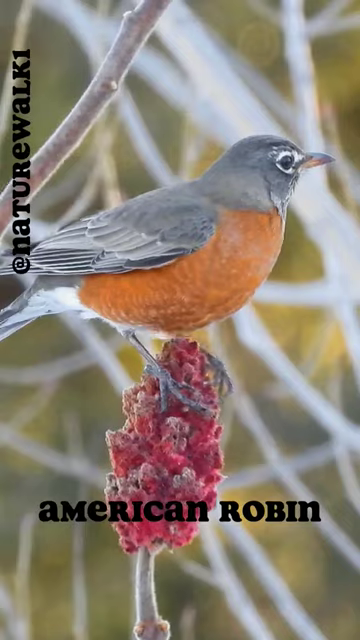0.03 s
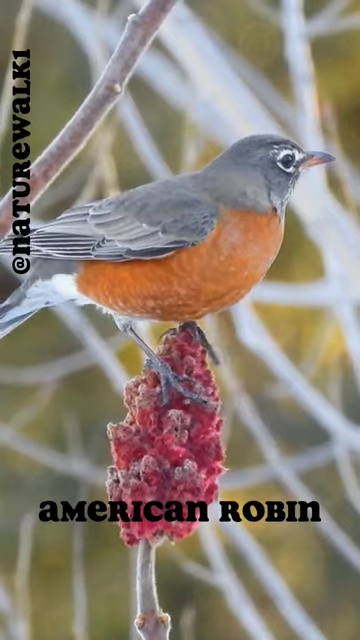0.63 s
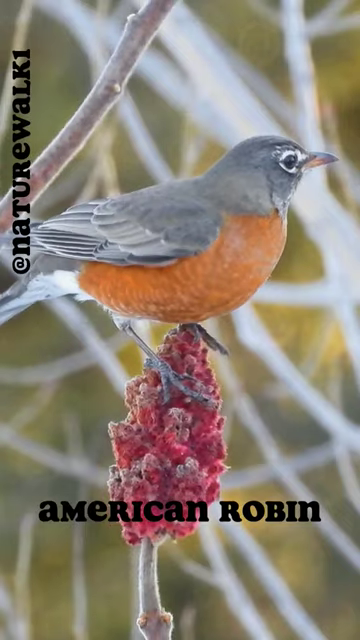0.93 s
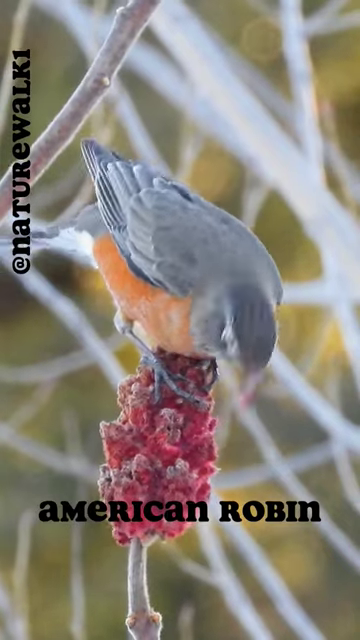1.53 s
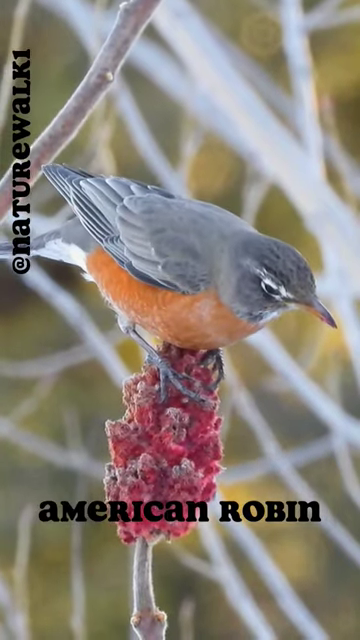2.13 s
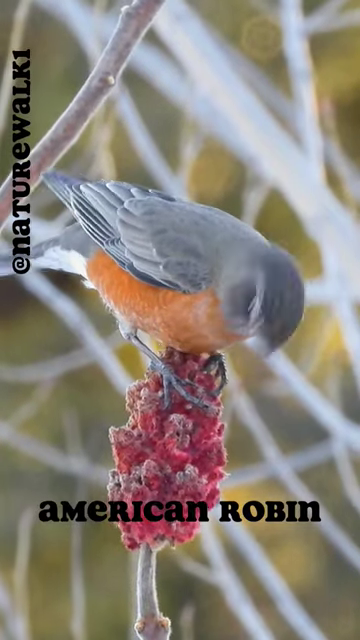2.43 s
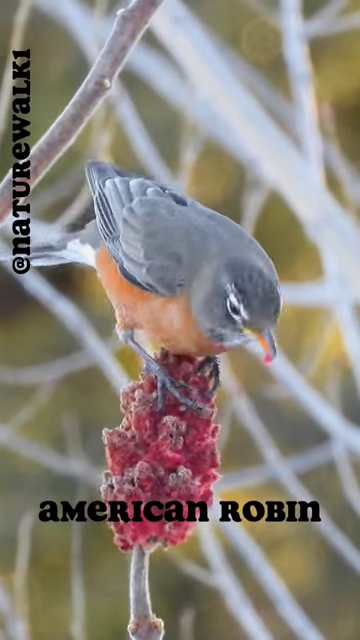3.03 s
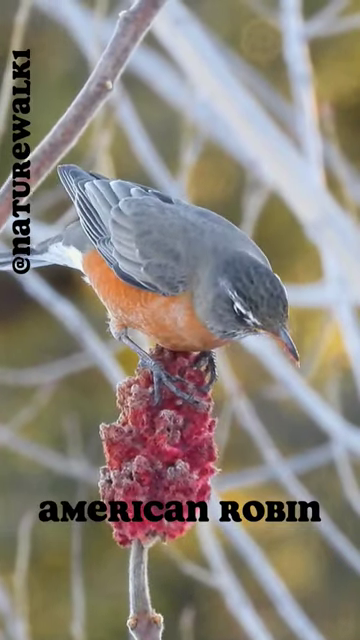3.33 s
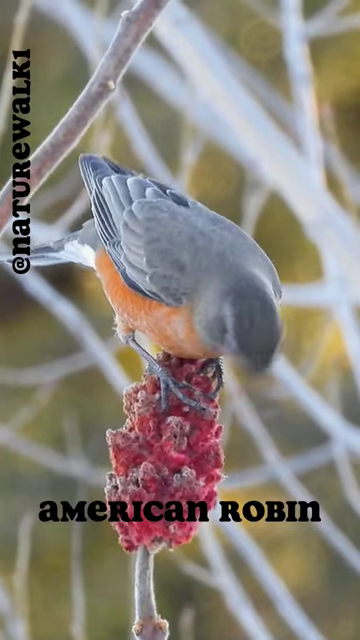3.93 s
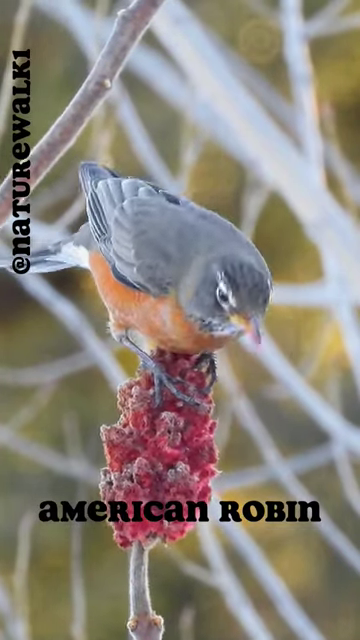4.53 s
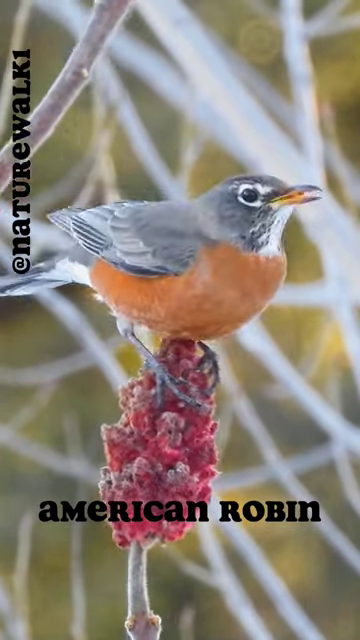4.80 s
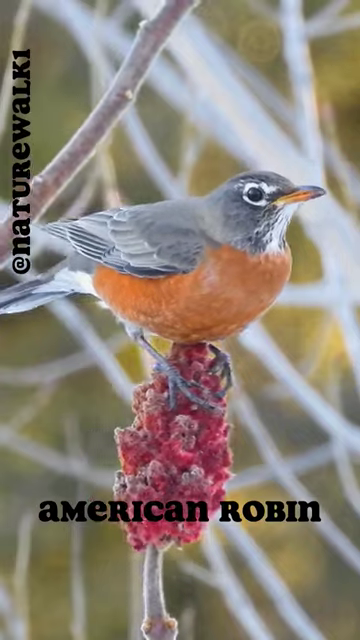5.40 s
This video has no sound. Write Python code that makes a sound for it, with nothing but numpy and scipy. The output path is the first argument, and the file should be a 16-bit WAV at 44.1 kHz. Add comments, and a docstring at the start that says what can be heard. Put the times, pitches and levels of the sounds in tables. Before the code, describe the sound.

A small stream fades in, gurgling with bubbles and a fine hiss of spray, its closest splashes slightly to the right. A songbird whistles three pairs of clear rising notes, then two falling ones opened by quick chips. Near the end, other birds add two sharp downward slides and a thin high call. The whistles echo lightly among the trees.

```python
"""A songbird whistles three pairs of rising slurs, then two falling ones, in bare trees by a small stream.
Two sharp down-slides and a thin high call join in. Each syrinx gives an almost pure, gliding sine;
ground, trunks and twigs echo it. The water gurgles with ringing bubbles and spits fine spray.
The scene fades in from silence."""
import sys
import numpy as np
from scipy import signal
from scipy.fft import rfft, irfft, next_fast_len
from scipy.io import wavfile

SR = 44100
rng = np.random.default_rng(int(sys.argv[2]) if len(sys.argv) > 2 else 0)


def wav_record(signal):
    """Record a signal, one row per channel, as 16-bit PCM in the file named by sys.argv[1]."""
    frames = np.transpose(np.atleast_2d(signal))
    bounded = np.clip(frames, -1, 1)
    # unit amplitude maps onto the largest positive 16-bit level
    quanta = np.round(bounded * 32767).astype(np.int16)
    wavfile.write(sys.argv[1], SR, quanta)


N = 245195
TIME_S = np.arange(N) / SR
FFT_SIZE = next_fast_len(N + SR // 2)
BINS_HZ = np.maximum(np.fft.rfftfreq(FFT_SIZE, 1 / SR), 1)


def from_db(db):
    """Decibels to gain."""
    return 10 ** (np.asarray(db) / 20)


def unit_rms(x):
    """Scale to rms 1."""
    return x / np.sqrt(np.mean(x ** 2) + 1e-20)


def curve_db(points):
    """Interpolate (Hz, dB) points onto BINS_HZ, on a log-frequency axis."""
    hz, db = np.transpose(points)
    return np.interp(np.log(BINS_HZ), np.log(hz), db)


def filtered(x, response):
    """Apply a frequency response given on BINS_HZ."""
    return irfft(rfft(x, FFT_SIZE) * response, FFT_SIZE)[..., :N]


def drift(rate_hz):
    """Smooth random wander, mostly below rate_hz; rms 1."""
    return unit_rms(filtered(rng.standard_normal(N), 1 / (1 + (BINS_HZ / rate_hz) ** 2)))


def ages(length_s):
    """Seconds since onset, per sample."""
    return np.arange(int(length_s * SR)) / SR


def add(out, start_s, sound):
    """Mix a sound in at start_s."""
    i = int(np.clip(start_s * SR, 0, N - 1))
    out[i:i + len(sound)] += sound[:N - i]


# Each row: frequency in Hz, relative spectral density in dB.
WATER_SPECTRUM = [(18, -54), (30, -19.5), (85, -27.5), (202, -10), (270, -12), (379, -4.4), (532, -2.5),
                  (673, -3.5), (852, -4.5), (1080, -4.5), (1400, -4.6), (2490, -7), (4090, -12.5),
                  (7650, -20.5), (13300, -22), (15500, -30)]

def water_colour():
    """Spectrum of running water, unit rms gain over 400-2000 Hz."""
    colour = from_db(curve_db(WATER_SPECTRUM))
    return colour / np.sqrt(np.mean(colour[(BINS_HZ > 400) & (BINS_HZ < 2000)] ** 2))


# Each row: frequency in Hz, gain on the water spectrum in dB.
WASH_EQ = [(60, -3), (180, -1.5), (400, -5.5), (2000, -9.5), (6000, -5.5), (10000, -3), (14000, -6)]
# Each row: frequency in Hz, left minus right in dB.
WASH_PAN = [(70, -6), (170, 12.5), (350, 3)]

def far_wash():
    """The distant stream, blurred to independent noise in each ear."""
    colour = water_colour() * from_db(curve_db(WASH_EQ) + curve_db(WASH_PAN) * [[.5], [-.5]])
    return from_db(-32.5) * filtered(rng.standard_normal((2, N)), colour)


def bubble(hz, t60_s, rise_octaves):
    """A bubble swells within a cycle, then rings down, its pitch climbing as it nears the surface."""
    progress = np.arange(int(t60_s * SR) + 2) / (t60_s * SR)
    cycles = np.cumsum(hz * 2 ** (rise_octaves * progress)) / SR
    return from_db(-60 * progress) * (1 - np.exp(-1.5 * cycles ** 2)) * np.sin(2 * np.pi * cycles)


def babble(low_hz, high_hz, median_cycles, max_octaves, spread_db, count):
    """Many rising bubbles of random size, equal energy per Hz; rms 1."""
    out = np.zeros(N)
    for when, pitch, strength, life, climb in rng.random((count, 5)):
        hz = low_hz * (high_hz / low_hz) ** pitch
        gain = hz * from_db(spread_db * min(-np.log(1 - strength), 3.5))
        t60_s = median_cycles * 2 ** (life * 2 - 1) / hz
        add(out, when * N / SR, gain * bubble(hz, t60_s, max_octaves * climb))
    return unit_rms(out)


def droplets(median_per_s, spread_db):
    """Droplets land as tiny clicks, most of them faint, in loose bunches; rms 1."""
    landed = rng.random(N) < median_per_s * from_db(4 * drift(18)) / SR
    sizes = from_db(spread_db * np.minimum(rng.exponential(1, N), 4))
    return unit_rms(landed * sizes * rng.choice([-1, 1], N))


# Each row: frequency in Hz, gain on the spray in dB.
SPRAY_EQ = [(100, -26), (5000, 0), (8000, 4.5), (11000, 4), (15000, 1)]

def riffle():
    """One stretch of stream: bubbles over a wash; above them the spray fizzes and spits."""
    colour, treble_share = water_colour(), 1 / (1 + (3500 / BINS_HZ) ** 4)
    large = babble(338.4, 890.4, median_cycles=54.4, max_octaves=.68, spread_db=3.8, count=360)
    small = babble(694, 3875, median_cycles=28, max_octaves=.54, spread_db=3, count=1900)
    wash = from_db(6.9) * rng.standard_normal(N) * from_db(3.2 * drift(26))
    gurgle = filtered(from_db(-7) * large + from_db(-.5) * small, colour)
    gurgle += filtered(wash, colour * np.sqrt(1 - treble_share))
    fizz = babble(3320, 11230, median_cycles=60, max_octaves=.059, spread_db=5, count=2600)
    hiss = from_db(1) * rng.standard_normal(N)
    spits = hiss + from_db(-5.5) * fizz + droplets(median_per_s=400, spread_db=2.5)
    flicker = from_db(2.6 * drift(17.5) + 2.2 * drift(220))
    spray = filtered(spits * flicker, colour * np.sqrt(treble_share) * from_db(curve_db(SPRAY_EQ)))
    return from_db(-41.2) * gurgle + from_db(-35.1) * spray


# Each row: start in seconds, pitch in Hz, level in dB, ring time in cycles.
NEAR_BUBBLES = [(0.822, 730, -27.5, 51), (0.948, 850, -26.5, 39), (1.225, 2570, -26, 40),
                (1.289, 706, -22.5, 21), (1.3, 523, -25, 12), (1.402, 970, -27, 53), (1.437, 406, -28, 34),
                (1.47, 1260, -27.5, 35), (1.505, 1680, -25.5, 52), (1.667, 1370, -25.5, 35),
                (1.689, 950, -27, 60), (1.719, 467, -12.5, 21), (1.8736, 3210, -20, 40),
                (1.947, 1570, -28, 30), (2.309, 1354, -23.5, 48), (2.57, 946, -27, 27),
                (2.705, 419, -29, 54), (3.335, 422, -27.5, 63), (3.337, 970, -23.5, 39),
                (3.814, 555, -30.5, 81), (4.09, 1900, -18, 14), (4.1425, 2100, -9, 12),
                (4.211, 528, -17.7, 14), (4.346, 530, -27.5, 46), (4.383, 1960, -26, 60),
                (4.516, 3020, -22, 38), (4.62, 2420, -25, 54), (4.671, 790, -27, 40),
                (4.681, 560, -25.5, 40), (5.053, 312, -33, 72), (5.141, 446, -24.5, 26),
                (5.144, 1480, -17.8, 19), (5.523, 560, -22, 24), (5.526, 920, -17.5, 38)]
# Each row: start in seconds, relative level in dB, pitch of the tiny bubble in Hz.
NEAR_SPLASHES = [(0.688, -29, 9410), (0.7024, -23, 4500), (0.7443, -28, 9540), (0.78, -35, 8120),
                 (0.9974, -34, 3140), (1.178, -30.5, 4600), (1.2155, -26.5, 9670), (1.3003, -24.5, 3540),
                 (1.368, -31, 9500), (1.565, -31, 8000), (1.5805, -29, 7800), (1.602, -31, 8000),
                 (1.618, -32, 5600), (1.668, -36, 8530), (1.7207, -26.5, 8460), (1.7463, -36, 5860),
                 (1.7926, -33.0, 4800), (1.816, -25, 9990), (1.826, -22, 3140), (1.8601, -25.5, 4240),
                 (1.8745, -32, 3290), (2.3602, -29, 7990), (2.3717, -30.1, 4670), (2.62, -33.5, 8700),
                 (2.6764, -31, 4780), (2.8864, -33, 8590), (2.9646, -22, 9750), (3.026, -30.5, 9630),
                 (3.036, -31, 6890), (3.089, -21.5, 9320), (3.118, -34, 9630), (3.2028, -21, 3600),
                 (3.295, -32, 4400), (3.386, -29, 3950), (3.414, -31, 4300), (3.637, -30, 4400),
                 (3.8463, -33.5, 9390), (3.9197, -28.5, 2820), (4.0906, -28.5, 2300), (4.143, -23, 2750),
                 (4.1581, -24, 2740), (4.2883, -29.5, 5560), (4.317, -28.5, 7700), (4.709, -23.5, 8810),
                 (4.8508, -28, 4630), (5.2905, -31, 3920), (5.497, -27, 5000)]

def near_water():
    """Single bubbles, and splashes that crack, leave a tiny bubble and scatter droplets."""
    out, age = np.zeros(N), ages(.05)
    for start_s, hz, db, cycles in NEAR_BUBBLES:
        add(out, start_s, from_db(db) * bubble(hz, cycles / hz, rise_octaves=.14))
    attack_s, crack_s, scatter_s = .0005, .0013, .013
    decay = np.exp(-age / crack_s) + from_db(-13.5) * np.exp(-age / scatter_s)
    burst = decay * (1 - np.exp(-age / attack_s))
    splash_band = signal.butter(1, [2000, 11000], "band", fs=SR, output="sos")
    for start_s, db, hz in NEAR_SPLASHES:
        splash = signal.sosfilt(splash_band, rng.standard_normal(len(age)) * burst)
        add(out, start_s, from_db(db + 4.5) * splash)
        add(out, start_s + .0007, from_db(db + 7.5) * bubble(hz, 14 / hz, rise_octaves=.15))
    # Bubbles radiate almost nothing below their own pitch.
    return signal.sosfilt(signal.butter(4, 250, "high", fs=SR, output="sos"), out)


def from_side(water, left_lag_s):
    """Sound from one side reaches the two ears at different times."""
    return filtered(water, np.exp(1j * np.pi * np.array([[-1], [1]]) * BINS_HZ * left_lag_s))


def stream():
    """Water on both sides; the nearest bubbles and splashes are on the right."""
    right = from_side(riffle() + near_water(), left_lag_s=3.9e-5)
    left = from_side(from_db(-5) * riffle(), left_lag_s=-2.3e-5)
    return right + left + far_wash()


# Ground and trunk echoes. Each row: delay in seconds, relative left and right levels in dB.
EARLY_ECHOES = [(.0074, -11.5, -7), (0.0139, -6, -21), (0.015, -4.5, -9.5), (0.0237, -37, -22),
                (0.0257, -17, -14), (0.028, -13, -11), (0.0527, -19, -11)]
# Twigs scatter short waves best. Each row: frequency in Hz, gain in dB.
TWIG_EQ = [(2350, -4.5), (2750, -1.5), (3250, 1.5), (3800, -.5)]

def woods(song, pan_db, early_db, twigs_db, trunks_db):
    """Early echoes beat against the glides; twigs add a short tail, far trunks a long one."""
    out = song * from_db([[pan_db / 2], [-pan_db / 2]])
    for delay_s, left_db, right_db in EARLY_ECHOES:
        echo = np.interp(TIME_S - delay_s, TIME_S, song, left=0)
        out += from_db(early_db) * echo * from_db([[left_db], [right_db]])
    age, scattered = ages(2), filtered(song, from_db(curve_db(TWIG_EQ)))
    for tail_db, t60_s, build_s in ((twigs_db, .13, .025), (trunks_db, .95, .03)):
        mid, side = rng.standard_normal((2, len(age)))
        envelope = from_db(-60 * age / t60_s) * (1 - np.exp(-(age / build_s) ** 2))
        tail = (mid + .5 * side * [[1], [-1]]) * envelope
        tail /= np.sqrt(np.sum(tail[0] ** 2))
        out += from_db(tail_db) * signal.fftconvolve(scattered[None], tail)[:, :N]
    return out


def syrinx(notes, waver_share, waver_hz, overtone_db=-44, release_s=.004):
    """An almost pure sine that glides and trembles. A note is (start, pitch curve, gain curve)."""
    out, tremble = np.zeros(N), 1 + waver_share * drift(waver_hz)
    for start_s, hz, gain in notes:
        age = np.arange(len(hz)) / SR
        phase = 2 * np.pi * np.cumsum(hz * np.interp(start_s + age, TIME_S, tremble)) / SR
        release = np.clip((age[-1] - age) / release_s, 0, 1)
        tone = np.sin(phase) + from_db(overtone_db) * np.sin(2 * phase)
        add(out, start_s, np.sqrt(2) * release * gain * tone)
    return out


def thin_call(start_s=5.342, length_s=.23, hz=7110, attack_s=.032):
    """One high pitch that swells and trembles ever more widely."""
    age = ages(length_s)
    gain = from_db(-39) * (1 - np.exp(-age / attack_s))
    waver_share = .02 * (1 + 4.5 * np.maximum(TIME_S - start_s, 0))
    return syrinx([(start_s, np.full(len(age), hz), gain)], waver_share, waver_hz=260)


# Each row: start in seconds, pitch drop in Hz, level in dB.
DOWN_SLIDES = [(5.013, 2050, -31.5), (5.547, 1400, -29)]

def down_slide(start_s, drop_hz, db):
    """The pitch plunges and settles; the voice catches, then holds a slowly sagging tone."""
    held_hz, sag_hz_per_s, settle_s = 3795, 650, .011
    attack_s, catch_at_s, catch_width_s, catch_db = .007, .054, .005, -21
    age = ages(.109)
    hz = held_hz - sag_hz_per_s * age + drop_hz * np.exp(-age / settle_s)
    catch = np.exp(-((age - catch_at_s) / catch_width_s) ** 2)
    return start_s, hz, from_db(db + catch_db * catch) * (1 - np.exp(-age / attack_s))


# Each row: start in seconds, length in seconds, top pitch in Hz, level in dB.
CHIPS = [(4.766, 0.032, 3290, -41), (4.783, 0.016, 3780, -29), (4.795, 0.02, 3080, -32),
         (5.281, 0.019, 4005, -32.5), (5.298, 0.0197, 3210, -29.5), (5.311, 0.023, 3670, -31)]

def chip(start_s, length_s, top_hz, db):
    """A brief arch in pitch and level; chips from both sides of the syrinx open each falling slur."""
    progress = ages(length_s) / length_s
    hz = top_hz - 1120 * (progress - .43) ** 2
    return start_s, hz, from_db(db) * np.sqrt(np.sin(np.pi * progress))


# Each row: start and length in seconds, glide top, glide bottom and onset overshoot in Hz, level in dB.
FALLING_SLURS = [(4.808, 0.0782, 2798, 2620, 529, -23.9), (5.32, 0.073, 2943, 2424, 130, -25)]

def falling_slur(start_s, length_s, upper_hz, lower_hz, overshoot_hz, db):
    """The pitch sinks while the note swells, then droops as it ends."""
    overshoot_s, droop_hz, droop_s = .0138, 70, .0075
    attack_s, swell_db = .0015, 4
    age = ages(length_s)
    remaining = 1 - age / length_s
    hz = lower_hz + (upper_hz - lower_hz) * remaining + overshoot_hz * np.exp(-age / overshoot_s)
    hz -= droop_hz * np.exp((age - length_s) / droop_s)
    return start_s, hz, from_db(db - swell_db * remaining) * (1 - np.exp(-age / attack_s))


# Pairs, the first of each longer and higher. Each row: start, scoop time constant and climb time in
# seconds, low pitch in Hz, steady rise in Hz/s, top pitch in Hz, nominal level in dB, swell in dB.
RISING_SLURS = [(2.012, 0.0025, 0.12, 2492, 1290, 3550, -22.5, 11.5),
                (2.234, 0.0065, 0.1, 2391, 2175, 3127, -20.5, 7),
                (2.663, 0.0044, 0.11, 2315, 3244, 3510, -21.3, 7.5),
                (2.865, 0.0076, 0.1, 2326, 1855, 3344, -18.5, 9.5),
                (3.246, 0.0049, .118, 2394, 1994, 3570, -21.3, 7),
                (3.461, .007, 0.1, 2369, 2210, 3237, -19.6, 7)]

def rising_slur(start_s, scoop_s, climb_s, low_hz, rise_hz_per_s, top_hz, db, swell_db):
    """The pitch scoops down, climbs ever faster as the note swells, then flicks to a softer top."""
    scoop_hz, bend_hz, sag_hz_per_s = 666, 312, 11000
    attack_s, flick_s, flick_db, hold_s = .004, .0035, -3, .0105
    age = ages(climb_s + hold_s)
    climbed = np.minimum(age / climb_s, 1)
    flicked = .5 + .5 * np.tanh((age - climb_s) / flick_s)
    slur_hz = low_hz + scoop_hz * np.exp(-age / scoop_s) + rise_hz_per_s * age + bend_hz * climbed ** 5.25
    held_hz = top_hz - sag_hz_per_s * np.maximum(age - climb_s, 0)
    hz = slur_hz + (held_hz - slur_hz) * flicked
    thinning_db = .009 * np.maximum(hz - 3150, 0)   # the voice thins at its highest pitches
    gain = from_db(db - swell_db * (1 - climbed) + flick_db * flicked - thinning_db)
    return start_s, hz, gain * (1 - np.exp(-age / attack_s))


def scene():
    """Three birds in the trees, the stream below."""
    rising = syrinx([rising_slur(*row) for row in RISING_SLURS], waver_share=.00049, waver_hz=120)
    falling = syrinx([falling_slur(*row) for row in FALLING_SLURS], waver_share=.017, waver_hz=200)
    chips = syrinx([chip(*row) for row in CHIPS], waver_share=.045, waver_hz=200)
    singer = woods(rising, pan_db=2.5, early_db=-.5, twigs_db=-7, trunks_db=-4.5)
    singer += woods(falling + chips, pan_db=2.5, early_db=-1.5, twigs_db=-12.5, trunks_db=-6)
    slides = syrinx([down_slide(*row) for row in DOWN_SLIDES], waver_share=.003, waver_hz=100)
    slider = woods(slides, pan_db=3.5, early_db=-5, twigs_db=-14, trunks_db=-7)
    thin_caller = woods(thin_call(), pan_db=-11.5, early_db=-1.5, twigs_db=2.5, trunks_db=-10)
    return singer + slider + thin_caller + stream()


def record(dry):
    """Linear fade-in, then a steep low-pass."""
    fade_start_s, fade_end_s, cutoff_hz = .14, 1.06, 15700
    fade = np.clip((TIME_S - fade_start_s) / (fade_end_s - fade_start_s), 0, 1)
    return signal.sosfilt(signal.ellip(10, .1, 80, cutoff_hz, fs=SR, output="sos"), dry * fade)


dry = scene()
out = record(dry)
wav_record(out)
```